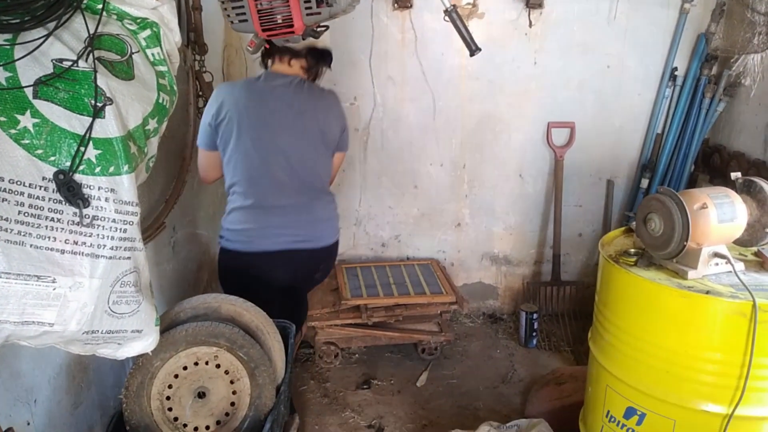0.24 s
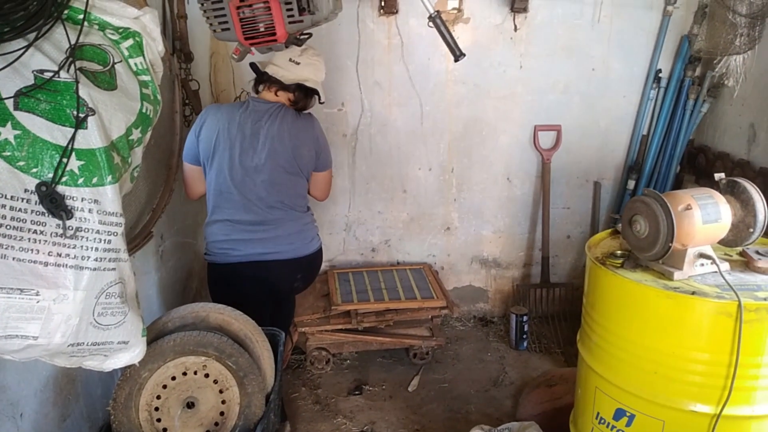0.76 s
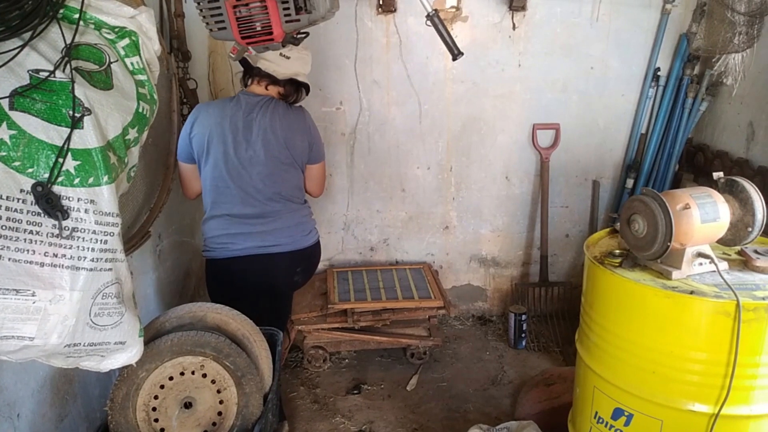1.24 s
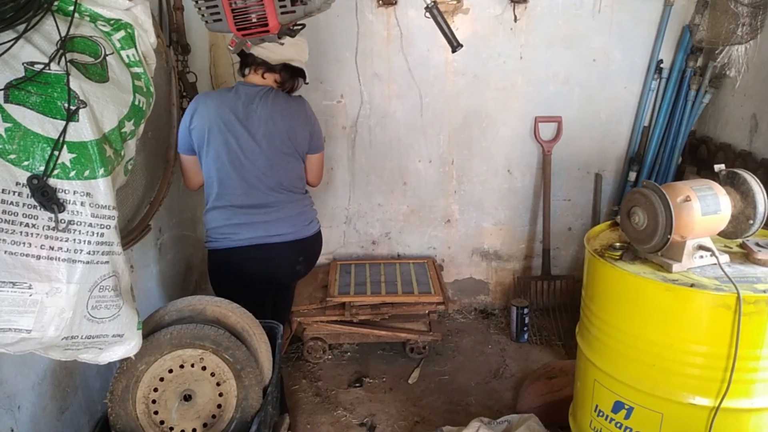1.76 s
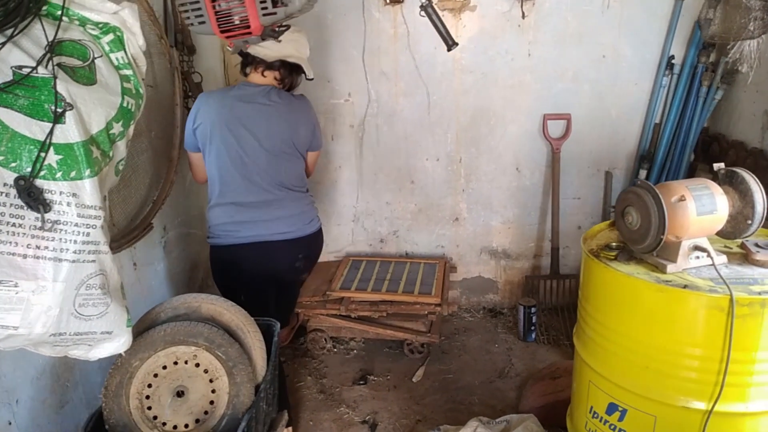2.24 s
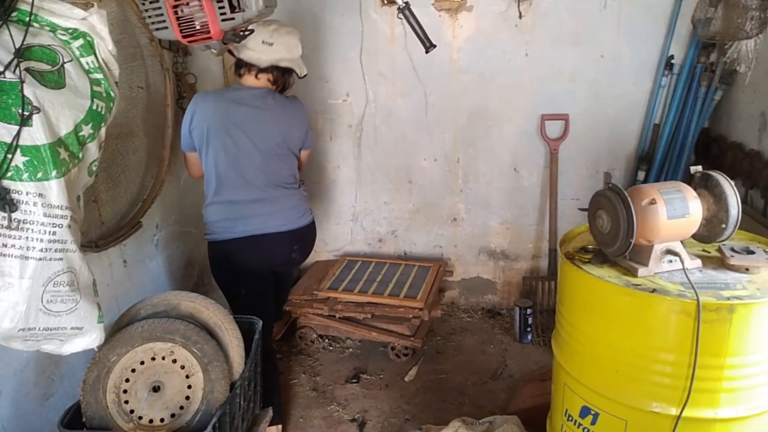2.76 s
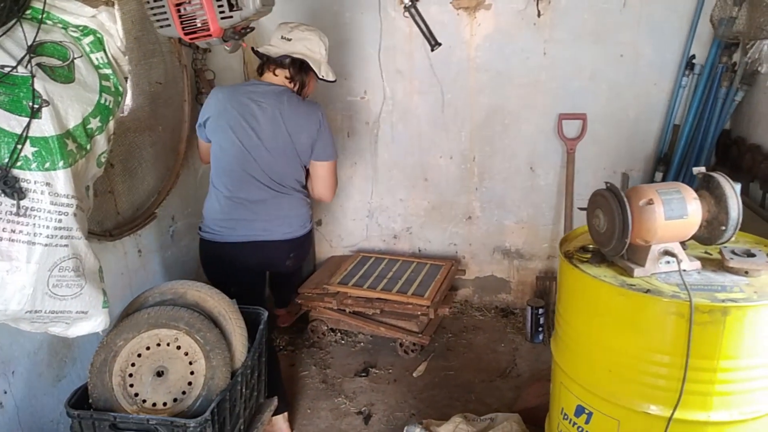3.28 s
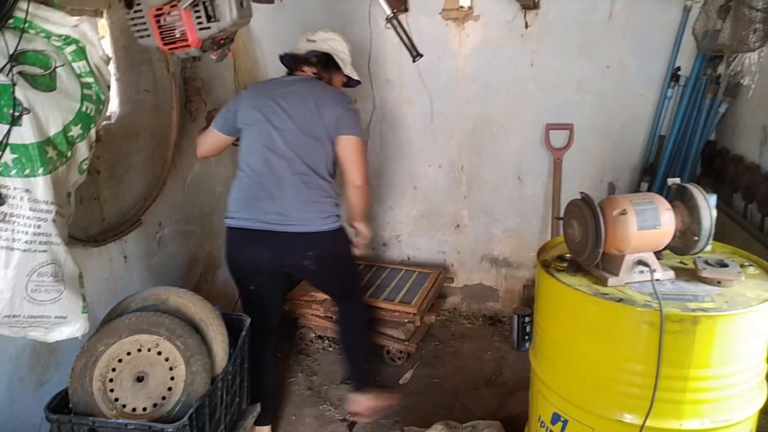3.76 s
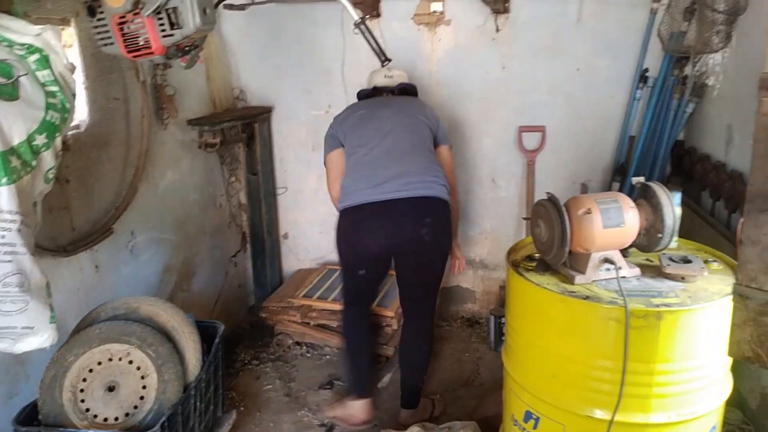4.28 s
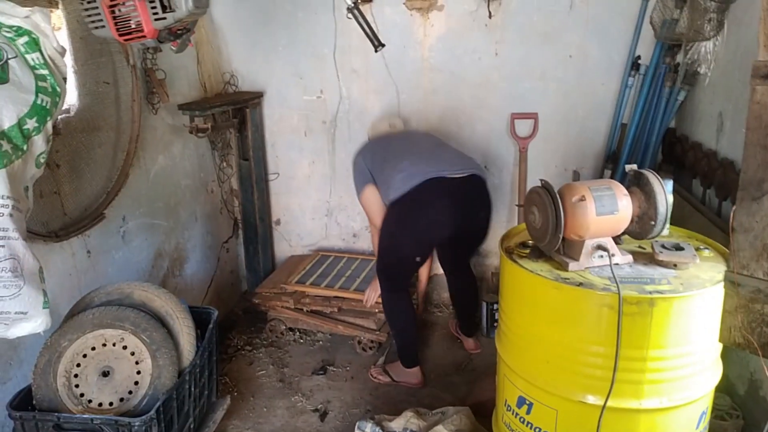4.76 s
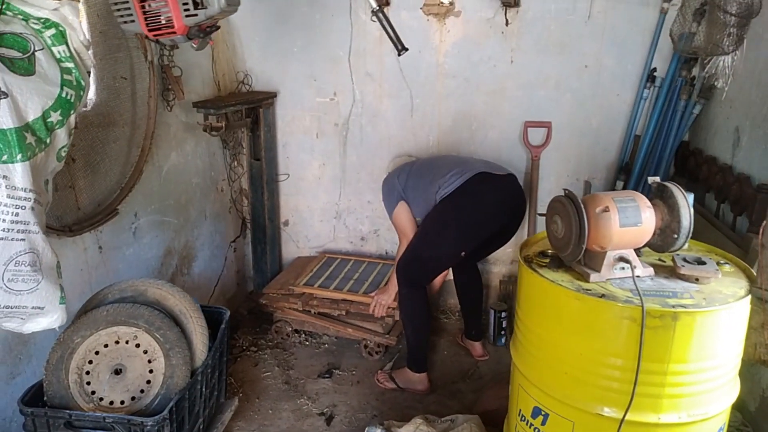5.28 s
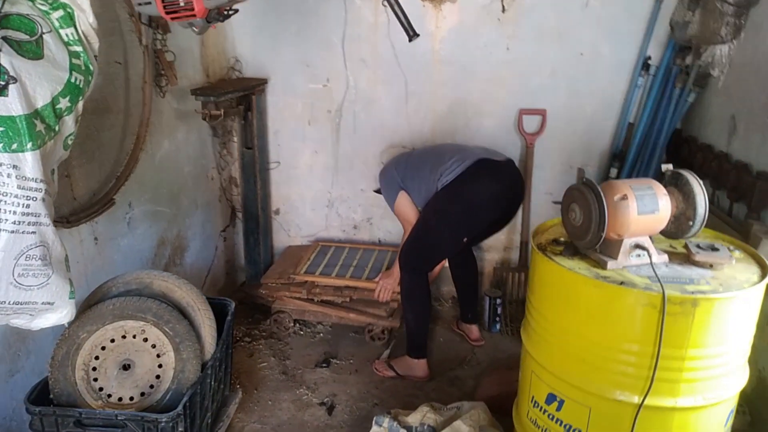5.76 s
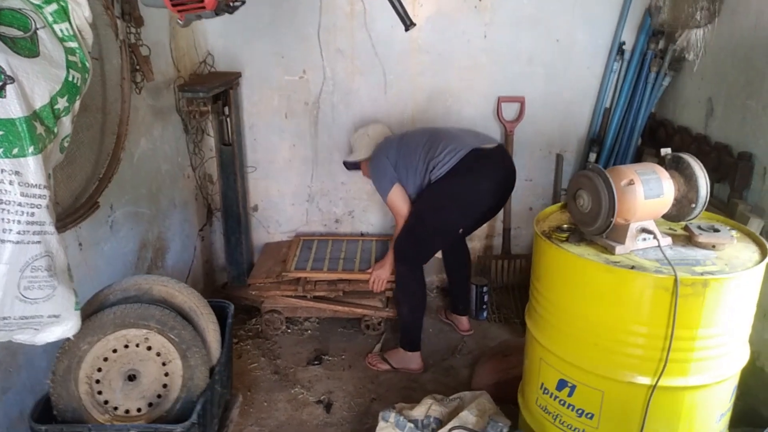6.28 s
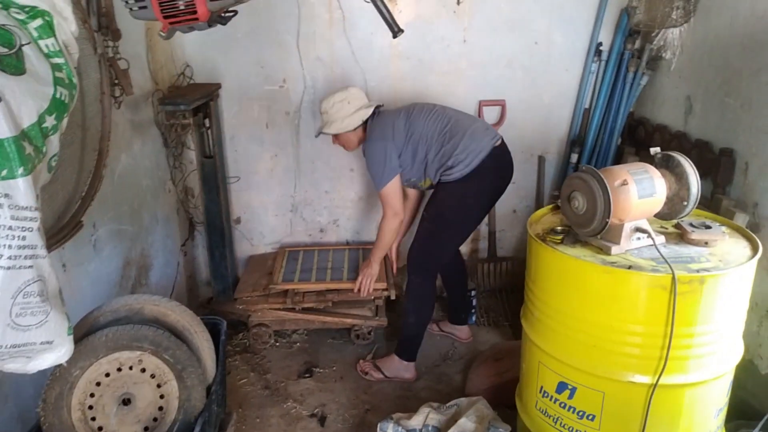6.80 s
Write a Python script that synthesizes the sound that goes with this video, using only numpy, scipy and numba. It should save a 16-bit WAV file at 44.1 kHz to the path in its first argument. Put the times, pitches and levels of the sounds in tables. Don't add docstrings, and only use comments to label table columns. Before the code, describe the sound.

Gritty wood scraping in short strokes, boards knocking, low footfall rumble, a loud handling thump midway, then a squeak, brief groan and sandy scuff.

```python
import sys
import numpy as np
from scipy import signal
from scipy.fft import rfft, irfft
from scipy.io import wavfile
from scipy.ndimage import uniform_filter1d
from numba import njit

SR = 44100
rng = np.random.default_rng(int(sys.argv[2]) if len(sys.argv) > 2 else 0)


def transcribe(u):
    v = np.clip(np.atleast_2d(u).T, -1, 1)
    q = np.round(v * 32767).astype(np.int16)
    wavfile.write(sys.argv[1], SR, q)


def makeup_ratio(level_db):
    decades = np.asarray(level_db, float) / 20
    return 10 ** decades


N = 310328
T = np.arange(N) / SR
HZ = np.maximum(np.fft.rfftfreq(N, 1 / SR), 1)


def rms_one(x):
    return x / np.sqrt(np.mean(x ** 2) + 1e-20)


def in_time(rows):
    start_s, *columns = np.transpose(rows)
    return [np.interp(T, start_s, column) for column in columns]


def at_hz(points):
    hz, value = np.array(points).T
    return np.interp(np.log(HZ), np.log(hz), value)


def during(rows):
    return (T >= rows[0][0]) & (T <= rows[-1][0])


def colour(x, gain):
    return rms_one(irfft(rfft(x) * gain, N))


def band(x, low_hz, high_hz, order=2):
    sos = signal.butter(order, [low_hz, high_hz], "band", fs=SR, output="sos")
    return signal.sosfilt(sos, x)


def drift(rate_hz):
    r = np.exp(-2 * np.pi * rate_hz / SR)
    return rms_one(signal.filtfilt([1 - r], [1, -r], rng.standard_normal(N)))


def grains(per_s, spread_db):
    size_db = spread_db * np.minimum(rng.exponential(1, (2, N)), 4)
    clicks = makeup_ratio(size_db) * rng.choice([-1, 1], (2, N))
    return rms_one(clicks * (rng.random((2, N)) < per_s / SR))


@njit
def resonate(x, hz, width_hz, sr):
    y = np.zeros(len(x))
    r = np.exp(-np.pi * width_hz / sr)
    for i in range(2, len(x)):
        push = (1 - r * r) / 2 * (x[i] - x[i - 2])
        y[i] = push + 2 * r * np.cos(2 * np.pi * hz[i] / sr) * y[i - 1] - r * r * y[i - 2]
    return y


def steady(hz):
    return np.full(N, float(hz))


def strokes(rows, hold=0):
    peak_s, rise_s, fall_s, level_db, extra = np.transpose(rows)[..., None]
    swell_db = 20 * np.maximum((peak_s - T) / rise_s, 0)
    fade_db = 20 * np.maximum((T - peak_s - hold * extra) / fall_s, 0)
    each_db = level_db - swell_db - fade_db
    loudest = each_db.argmax(axis=0)
    return each_db.max(axis=0), uniform_filter1d(extra[loudest, 0], size=1500)


# hz, level_db_per_hz
QUIET_COLOUR = [(12, -28), (20, 9.5), (129, -19), (298, -18), (1300, -39), (2150, -30.5), (3970, -36.5),
                (6940, -44.5), (9170, -44), (15600, -89)]


def quiet():
    gain = makeup_ratio(at_hz(QUIET_COLOUR))
    mid = colour(rng.standard_normal(N), gain)
    side = colour(rng.standard_normal(N), gain)
    stereo = mid * makeup_ratio(np.array([[2.5], [-2.5]])) + 0.5 * side * np.array([[1], [-1]])
    return makeup_ratio(-56.5) * stereo


# peak_s, rise_s (20 dB), fall_s (20 dB), level_db, hold_s
WEIGHT_SHIFTS = [(0.0, 0.11, .2, -63.5, 0), (.39, 0.13, 0.28, -56.5, 0.89), (1.71, 0.44, 1.6, -47.5, 0.31),
                 (2.24, 0.22, 0.8, -36, 0), (2.75, .35, 0.26, -46, 0.54), (3.61, .08, .3, -54, 0),
                 (4.01, 0.1, 0.18, -48.5, 0.056), (4.36, 0.22, 0.11, -39.5, 0),
                 (4.62, .17, 0.088, -52.5, 0.0077), (4.91, 0.13, 0.15, -50, 0.088),
                 (5.2, .05, 0.17, -62, 0.36), (5.95, .24, .83, -40.5, 0.12)]


def rumble():
    level_db, _ = strokes(WEIGHT_SHIFTS, hold=0.99)
    return makeup_ratio(level_db + 1.4 * drift(11)) * rms_one(band(rng.standard_normal(N), 2.2, 76))


# start_s, peak_db, pitch_hz
HEEL_THUDS = [(2.233, -27, 61), (2.79, -27.5, 44.5), (3.019, -36, 36), (4.006, -33.5, 36.2),
              (4.889, -37.5, 44.3), (5.961, -31.5, 64)]


def heel_thuds():
    out = np.zeros(N)
    for start_s, peak_db, pitch_hz in HEEL_THUDS:
        age_s = np.maximum(T - start_s, 0)
        out += makeup_ratio(peak_db) * np.sin(2 * np.pi * pitch_hz * age_s) * np.exp(-age_s * pitch_hz / 1.4)
    return out


# peak_s, peak_db, rise_s, fall_s
PORT_PRESSES = [
    (4.159, -2.5, 0.00017, 0.0036),
    (4.193, -7, 0.0032, 0.0049),
    (4.426, 3.5, .003, 0.0035),
]
# time_s, level_db
PRESS_SCRATCH = [(4.155, -53), (4.158, -25), (4.165, -30), (4.19, -39.5), (4.2, -64)]


def press():
    pushes = np.zeros(N)
    for peak_s, peak_db, rise_s, fall_s in PORT_PRESSES:
        side_s = np.where(T < peak_s, rise_s, fall_s)
        pushes += makeup_ratio(peak_db) * np.exp(-np.abs(T - peak_s) / side_s)
    scratch_db, = in_time(PRESS_SCRATCH)
    skin = rms_one(band(rng.standard_normal(N), 270, 3620, order=3))
    return band(pushes, 22, 2000, order=1) + makeup_ratio(scratch_db) * during(PRESS_SCRATCH) * skin


# time_s, level_db, flutter_hz, scratch_db (under the flutter)
PORT_BRUSH = [(4.395, -51, 120, -40), (4.412, -26, 130, -40), (4.42, -6, 150, -22),
              (4.436, 0.5, 228.4, -22.5), (4.455, -10.5, 450, -13), (4.47, -17.5, 450, -12),
              (4.49, -39, 350, -28), (4.53, -52, 200, -24)]


def brush():
    level_db, flutter_hz, scratch_db = in_time(PORT_BRUSH)
    white = rng.standard_normal(N)
    flutter = resonate(resonate(white, flutter_hz, 280.0, SR), flutter_hz, 600.0, SR)
    lumps = rms_one(flutter) + 0.8 * rms_one(band(white, 35, 200))
    air = rms_one(band(lumps, 24, 1000))
    scratch = makeup_ratio(scratch_db) * rms_one(band(white, 800, 3000, order=3))
    return during(PORT_BRUSH) * makeup_ratio(level_db) * (air + scratch)


# start_s, length_s, pitch_hz, level_db; the last row adds a tone near 830 Hz
BOARD_NOTES = [(1.723, 0.014, 1296, -32.5), (1.72, 0.075, 570, -43.5), (3.5, 0.12, 800, -55.5),
               (3.499, 0.053, 714, -50), (3.945, 0.06, 757, -45), (4.214, .06, 660, -46),
               (4.21, 0.047, 880, -54.5), (6.198, 0.17, 830, -42)]
# start_s, length_s, pitch_hz, level_db
SLAT_CHIRPS = [(.395, 0.074, 3000, -54), (.665, 0.044, 2990, -45), (.76, 0.23, 2210, -63),
               (1.718, 0.039, 2170, -45), (2.136, 0.036, 2045, -41), (4.88, 0.052, 2380, -52.5),
               (5.025, .05, 3770, -54), (6.03, 0.044, 2950, -37.5), (6.18, 0.041, 2800, -45)]
# start_s, length_s, pitch_hz, level_db
GRAIN_WHISTLES = [(.67, 0.028, 9230, -56.5), (1.356, 0.035, 8260, -70), (2.347, 0.035, 5600, -57),
                  (2.35, .031, 9820, -59), (2.72, 0.18, 6000, -58), (2.847, 0.083, 11500, -64),
                  (3.418, 0.056, 8160, -64), (5.752, .1, 8660, -59.5), (6.03, .022, 6860, -47),
                  (6.047, .21, 5816, -60), (6.112, .031, 7080, -47)]
# start_s, length_s, pitch_hz, level_db
SANDAL_SWISHES = [(.658, .08, 880, -47.5), (4.52, 0.093, 5950, -43.5), (6.11, .025, 4570, -45),
                  (6.34, 0.03, 5100, -44.5)]


def rubs():
    out, white = np.zeros(N), rng.standard_normal(N)
    warm_up = 3000
    kinds = [(BOARD_NOTES, 11.0), (SLAT_CHIRPS, 9.0), (GRAIN_WHISTLES, 55.0), (SANDAL_SWISHES, 2.3)]
    for rows, q in kinds:
        for start_s, length_s, pitch_hz, level_db in rows:
            a, b = int(start_s * SR), int((start_s + length_s) * SR)
            width_hz = float(pitch_hz / q)
            once = resonate(white[a - warm_up:b], steady(pitch_hz), width_hz, SR)
            twice = resonate(once, steady(pitch_hz), width_hz, SR)[warm_up:]
            swell = np.sin(np.pi * np.linspace(0, 1, b - a) ** 0.6) ** 0.5
            out[a:b] += makeup_ratio(level_db) * rms_one(twice) * swell
    return out


# start_s, peak_db, pitch_hz, brightness_db
KNOCKS = [(0.402, -44.5, 226, -12), (0.668, -29.5, 370, -15), (1.637, -20.5, 315, -34),
          (1.719, -24, 607, -59.5), (1.888, -29, 366, -34), (2.707, -32, 223, -23),
          (3.141, -43, 670, -10.5), (4.881, -53, 206, 7), (5.14, -34.5, 738, 0.5), (5.348, -33, 390, -58),
          (5.717, -20.5, 599, -35), (7.017, -47.5, 1490, 8.5)]


def knocks():
    out, age_s = np.zeros(N + SR), np.arange(SR // 5) / SR
    modes = [(1.01, 0.88), (1.7, 0.35), (2.6, 0.15)]
    for start_s, peak_db, pitch_hz, bright_db in KNOCKS:
        white = rng.standard_normal(len(age_s))
        contact = white * np.exp(-age_s / 0.016) * np.minimum(age_s / 0.0015, 1)
        ring = np.zeros(len(age_s))
        for ratio, share in modes:
            ring += share * rms_one(resonate(contact, steady(pitch_hz * ratio), 20.4 * ratio, SR))
        crack = makeup_ratio(bright_db + 1.0) * rms_one(band(contact, 1300, 6500, order=3))
        a = int(start_s * SR)
        out[a:a + len(age_s)] += makeup_ratio(peak_db - 24.5) * (ring + crack)
    return out[:N]


# time_s, slip_hz, level_db
GROAN = [(6.195, 272, -58), (6.215, 270, -43), (6.24, 252, -39), (6.26, 247, -41), (6.29, 241, -35),
         (6.32, 218, -35), (6.345, 236, -38), (6.365, 241, -40), (6.385, 240, -60)]
# mode_hz, width_hz, level_db
GROAN_MODES = [(230, 81, -0.5), (484, 130, -9), (720, 184, 3), (1055, 133, -0.5)]


def groan():
    slip_hz, level_db = in_time(GROAN)
    phase = 2 * np.pi * np.cumsum(slip_hz * (1 + 0.02 * drift(60))) / SR
    out = np.zeros(N)
    for k in range(1, 7):
        passed = np.zeros(N)
        for mode_hz, width_hz, mode_db in GROAN_MODES:
            passed += makeup_ratio(mode_db) / (1 + (2 * (k * slip_hz - mode_hz) / width_hz) ** 2)
        out += passed * (1 + 0.5 * drift(56)) * np.sin(k * phase)
    return during(GROAN) * makeup_ratio(level_db - 2.5) * out


# time_s, slip_hz, level_db, second_harmonic_db
SQUEAK = [(5.78, 1227, -36, -43), (5.815, 1163, -27.5, -36), (5.845, 1163, -22, -32.5),
          (5.886, 1240, -25.5, -32.5), (5.93, 1241, -26, -37), (5.98, 1280, -28, -27),
          (6.04, 1298, -27, -37), (6.07, 1355, -48, -35), (6.14, 1450, -84, -47)]
# peak_s, gain_db
THROBS = [(5.813, 5), (5.842, 7), (5.853, 6), (5.87, 8), (5.885, 9), (5.896, 5), (5.908, 4), (5.919, 6),
          (5.971, 5)]


def squeak():
    slip_hz, first_db, second_db = in_time(SQUEAK)
    phase = 2 * np.pi * np.cumsum(slip_hz * (1 + 0.0128 * drift(90.6))) / SR
    throb_s = 0.0036
    grip_db = sum(gain_db * np.exp(-((T - peak_s) / throb_s) ** 2) for peak_s, gain_db in THROBS)
    out = np.zeros((2, N))
    for k, level_db in enumerate([first_db, second_db, second_db - 12, second_db - 25]):
        ragged = 1 + (0.2 + 0.15 * k) * np.array([drift(70), drift(70)])
        wander = (0.7 + 0.3 * k) * np.array([drift(25), drift(25)])
        out += makeup_ratio(level_db + grip_db) * ragged * np.sin((k + 1) * phase + wander)
    return during(SQUEAK) * out


# start_s, end_s
PAUSES = [(0, 0.164), (0.201, 0.35), (0.506, 0.651), (1.263, 1.342), (1.402, 1.469), (1.885, 1.92),
          (2.42, 2.662), (3.488, 3.526), (3.55, 3.62), (3.673, 3.847), (3.888, 3.95), (4.28, 4.399),
          (4.8, 4.845), (5.287, 5.32), (5.482, 5.501)]


def pauses():
    shut = sum((T > start_s) & (T < end_s) for start_s, end_s in PAUSES)
    return uniform_filter1d(shut.astype(float), size=300)


# peak_s, rise_s (20 dB), fall_s (20 dB), level_db, fine_db (over
GRIT_SCUFFS = [(.185, .1, .03, -78, -2), (.412, 0.092, .2, -55.5, -6.5), (.674, 0.056, .1, -43.5, -5.5),
               (.904, 0.66, 0.23, -53.5, -5.5), (1.194, 0.24, 0.077, -50, -5.5), (1.37, .06, .03, -61, -17),
               (1.629, 0.17, 0.29, -44, -7.5), (1.739, .3, .27, -55.5, -10), (2.112, 0.12, 0.28, -39, -8.5),
               (2.282, 0.34, 0.07, -43, -8.5), (2.72, .04, .5, -52, -1.5), (2.801, 0.1, 0.11, -39, -7),
               (2.887, 0.27, 0.22, -45, -7), (3.255, 0.23, 0.035, -53, -6.5), (3.3, 0.18, 0.45, -60, -3.5),
               (3.65, 0.051, .5, -72, 3), (3.87, .3, .3, -71.5, -2.5), (3.994, 0.045, 0.3, -50, -9),
             (4.15, 0.17, 0.085, -43, -15), (4.23, .3, .15, -59.5, -12.5), (4.514, 0.053, .3, -47.5, -13.5),
             (4.56, 0.11, 0.11, -39.5, -6.5), (4.66, 0.094, 0.096, -47, -2), (4.77, .2, .2, -63, 5),
             (4.906, 0.046, 0.08, -48.5, -4.5), (5.04, .8, .8, -64, 2), (5.155, 0.038, 0.11, -44, -7.5),
             (5.365, 0.033, 0.17, -54, -12), (5.6, 0.79, 0.56, -60, -4.5), (5.73, 0.12, 0.09, -43.5, -6.5),
             (5.879, 0.13, 0.45, -39, -8.5), (5.971, .1, 0.3, -40, -8), (6.183, .3, 0.66, -51, -6),
             (6.4, 0.36, 0.42, -56.5, -6), (6.708, 0.059, 0.15, -38, -2.5), (6.75, 0.11, 0.08, -33, -8.5),
             (6.901, .3, 0.76, -59, -3.5)]
# hz, level_db_per_hz
SAND_COLOUR = [(530, -31.5), (900, -2.5), (1150, -9), (1500, -7), (2340, 1.5), (3000, -3.5), (4040, -7.5),
               (5580, -13.5), (7000, -17), (9400, -13.5), (10200, -18.5), (10900, -30.5), (13000, -35.5),
               (15600, -52.5)]


def grit():
    coarse_db, fine_db = strokes(GRIT_SCUFFS)
    coarse_db = coarse_db - 13 * pauses()
    sand = colour(grains(per_s=9000, spread_db=1.5), makeup_ratio(at_hz(SAND_COLOUR)))
    coarse = rms_one(band(sand, 1230, 3900, order=3))
    fine = rms_one(band(sand, 4400, 16000, order=3)) * makeup_ratio(fine_db + drift(25))
    return makeup_ratio(coarse_db + 1.2 * drift(25)) * (coarse + fine)


# peak_s, rise_s (20 dB), fall_s (20 dB), level_db, slat_db (over body)
FRAME_STROKES = [(.4, 0.089, 0.12, -46.5, -4), (.68, 0.051, 0.24, -46, 1.5), (.88, 0.39, 0.21, -47.5, -4),
                 (1.16, 0.13, 0.18, -45.5, -5), (1.66, 0.21, .09, -34.5, -6), (1.74, 0.13, 0.16, -33, -2.5),
                 (1.9, .2, 0.35, -50, -4.5), (2.11, 0.087, 0.3, -31.5, -2.5), (2.19, 0.17, 0.18, -27, -5.5),
                 (2.26, 0.19, 0.077, -26, -6), (2.73, .03, 0.27, -37, 1), (2.88, .15, 0.12, -32, -6),
                 (3.0, .2, 0.09, -45, -5), (3.145, .02, .2, -56, 7.5), (3.27, 0.18, .09, -48, -6),
                 (3.4, .3, 1.8, -63.5, -5)]
# peak_s, rise_s (20 dB), fall_s (20 dB), level_db, slat_db (over body)
STACK_STROKES = [(3.97, 0.027, 0.59, -52.5, 4.5), (4.17, 0.28, 0.19, -47.5, -1),
                 (4.39, .5, 0.071, -51.5, -4), (4.542, 0.066, 0.34, -58, 5), (4.922, .16, 0.067, -56, -7),
                 (5.168, 0.075, 0.12, -46.5, 1.5), (5.354, 0.016, 0.16, -35.5, -10.5),
                 (5.733, 0.051, 0.12, -39, 3.5), (5.986, 0.16, 0.17, -32.5, -0.5),
                 (6.19, 0.27, .35, -42, -0.5), (6.39, .3, .18, -48.5, 1.5), (6.6, .3, 0.57, -62.5, -7),
                 (6.746, .08, 0.077, -61.5, 7)]
# time_s, body_hz
GRIP = [(.4, 238), (1.2, 315), (1.7, 315), (2.15, 251), (2.9, 318), (4.2, 225), (5.36, 394), (6.0, 358),
        (6.4, 260)]
# hz, level_db_per_hz
WOOD_COLOUR = [(65, -30), (110, 1.5), (321, -7), (354, -3), (481, -5.5), (592, -5), (1500, -20),
               (1950, -19), (3300, -120)]


def drag():
    body_db, slat_db = strokes(FRAME_STROKES + STACK_STROKES)
    body_db = np.maximum(body_db, -76)
    body_hz, = in_time(GRIP)
    wood = colour(grains(per_s=1800, spread_db=3.0), makeup_ratio(at_hz(WOOD_COLOUR)))
    ringing = np.array([resonate(stream, body_hz, 50.0, SR) for stream in wood])
    body = rms_one(rms_one(band(wood, 180, 628)) + 0.65 * rms_one(ringing))
    slat = rms_one(band(wood, 500, 1600)) * makeup_ratio(slat_db + 1.2 * drift(30))
    return makeup_ratio(body_db + drift(20)) * (body + slat)


# hz, likeness (0 to 1)
LIKENESS = [(60, 0.32), (300, 1), (650, 0.65), (1400, 0.065), (9000, 0.0077)]


def ports(streams):
    alike = np.clip(at_hz(LIKENESS), 0, 1)
    mid, side = rfft(streams) * np.sqrt([1 + alike, 1 - alike]) / np.sqrt(2)
    return irfft(np.array([mid + side, mid - side]), N)


def shed(x):
    t60_s, tail_db, left_lag_s = 0.14, -8, 0.0001
    tails = rng.standard_normal((2, N)) * makeup_ratio(-60 * T / t60_s) * (T > 0.003)
    tail = ports(tails / np.sqrt(np.sum(tails[0] ** 2)))
    lag = np.exp(-2j * np.pi * HZ * np.array([[left_lag_s], [0]]))
    return irfft(rfft(x) * (0.99 * lag + makeup_ratio(tail_db) * rfft(tail)), N)


# hz, left_over_right_db
LEFT_LEAD = [(60, 1.5), (200, 0.5), (350, 4), (750, 1), (2200, 5.5), (9000, 6)]


def scene():
    spread = ports(drag() + grit())
    air = shed(spread + squeak() + groan() + rubs() + knocks())
    lead = makeup_ratio(at_hz(LEFT_LEAD) / 2)
    air = irfft(rfft(air) * np.array([lead, 1 / lead]), N)
    floor = (rumble() + heel_thuds()) * makeup_ratio(np.array([[1.2], [-1.2]]))
    finger = (brush() + press()) * np.array([[1], [0]])
    return air + floor + quiet() + finger


def low_pass(x):
    return signal.sosfilt(signal.butter(12, 15710, fs=SR, output="sos"), x)


def record(dry):
    gate_hz, gate_db = 860, -12.5
    gate = makeup_ratio(gate_db * pauses())
    treble = irfft(rfft(dry) / (1 + (gate_hz / HZ) ** 6), N)
    mix = np.clip(dry - (1 - gate) * treble, -1, 1)
    return low_pass(mix)


dry = scene()
out = record(dry)
transcribe(out)
```